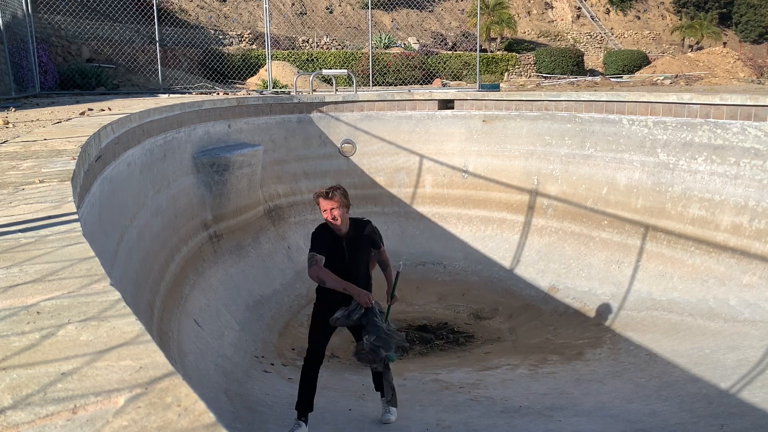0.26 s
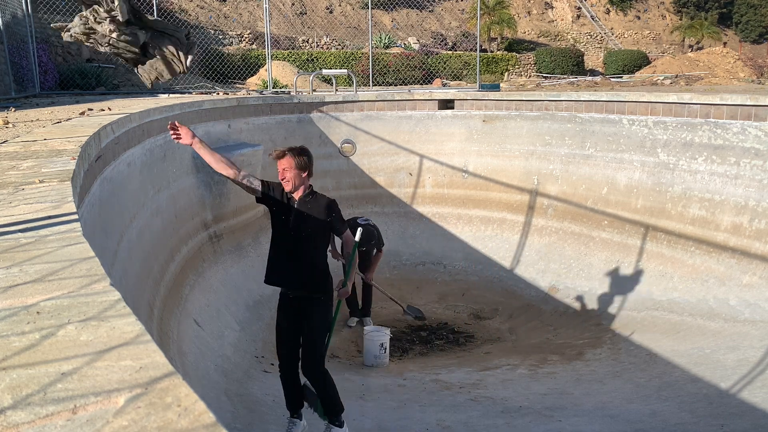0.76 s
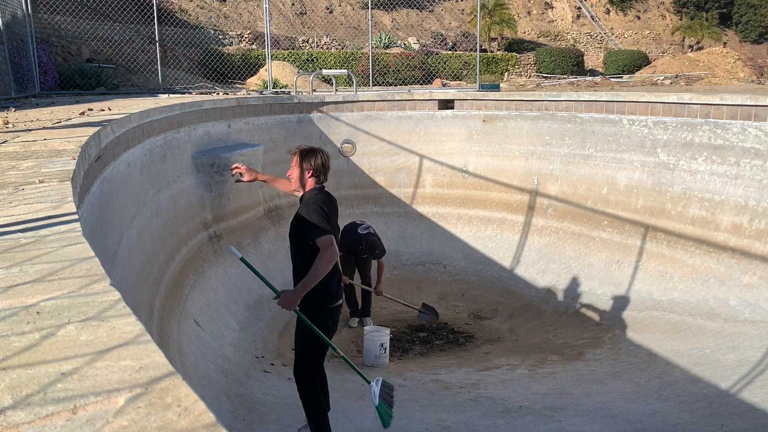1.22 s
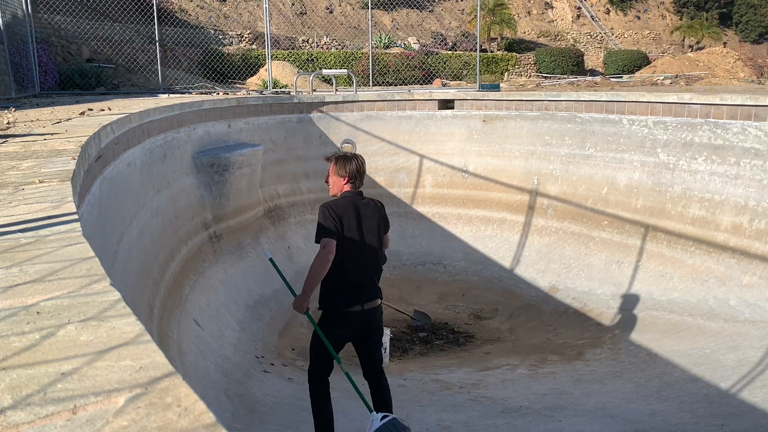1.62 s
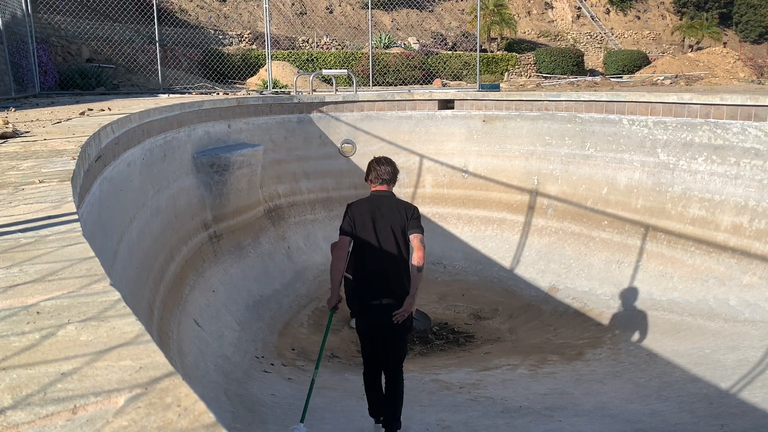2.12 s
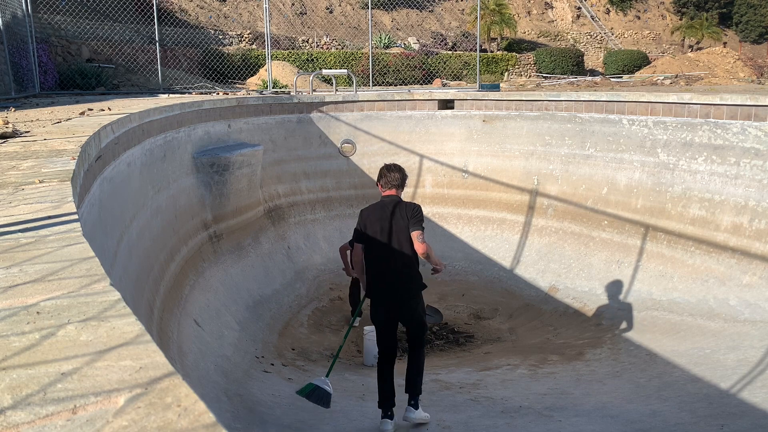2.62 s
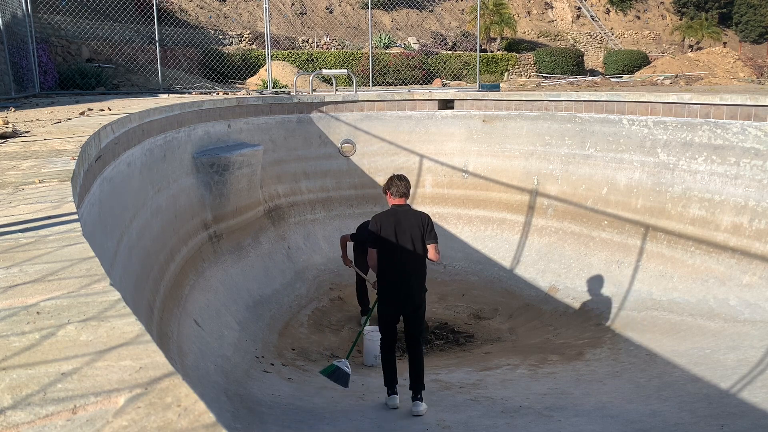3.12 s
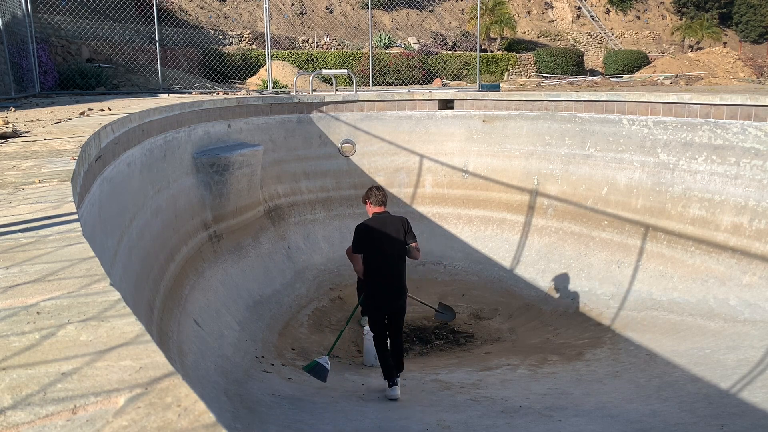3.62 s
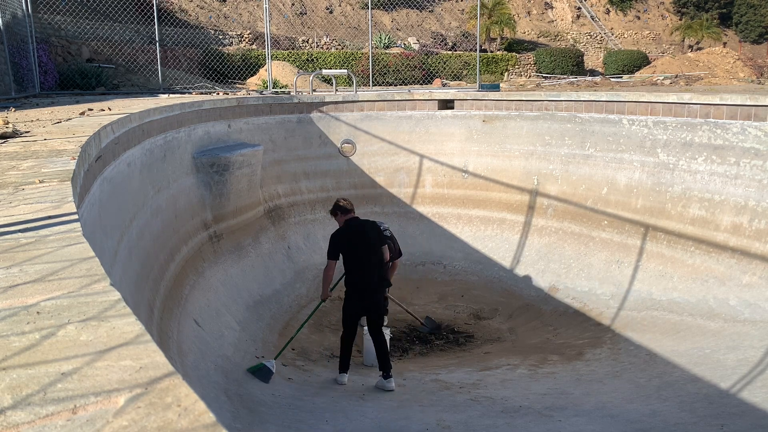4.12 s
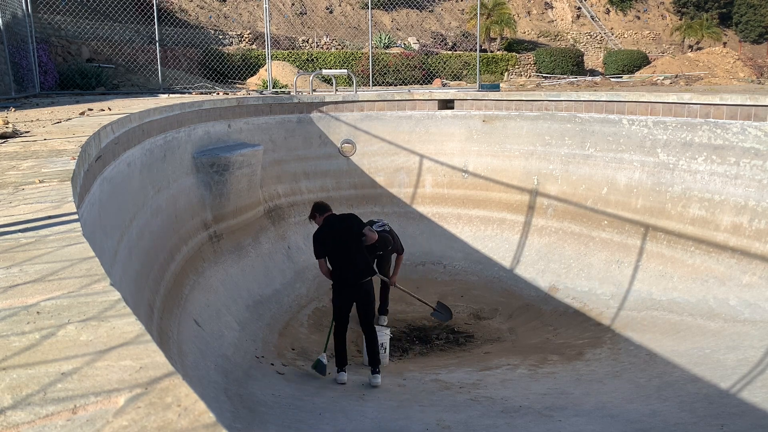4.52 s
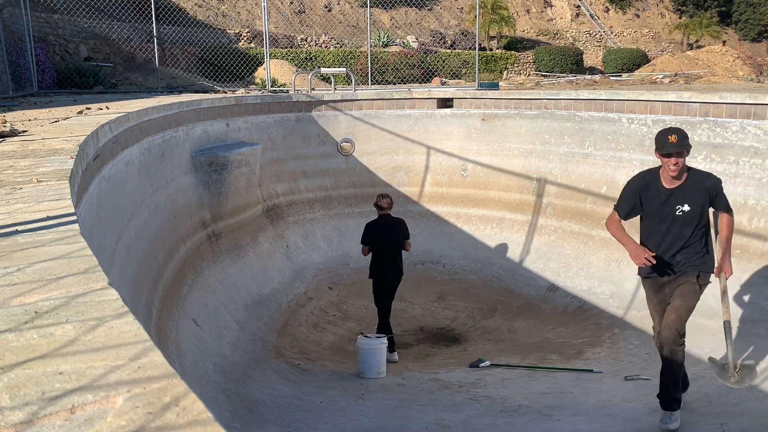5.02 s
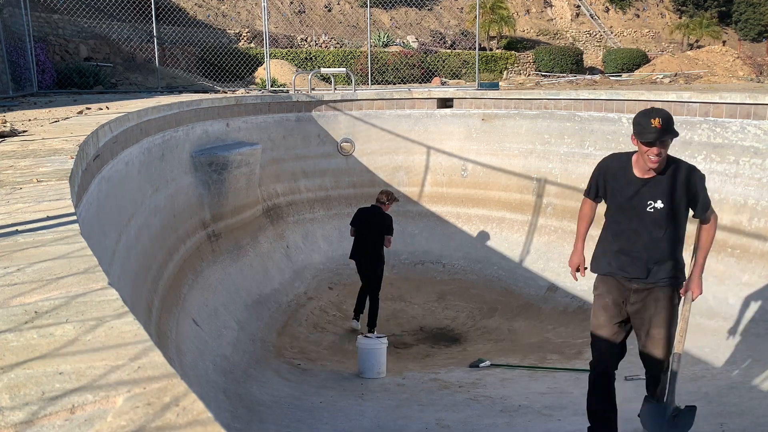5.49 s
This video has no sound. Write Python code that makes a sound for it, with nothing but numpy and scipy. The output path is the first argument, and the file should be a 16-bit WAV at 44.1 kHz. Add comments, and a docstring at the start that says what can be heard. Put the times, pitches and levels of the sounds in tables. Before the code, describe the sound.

A shovel blade grates through grit in an empty concrete pool, ringing with rough metallic resonance, while bristles and sand hiss. Knocks and dry debris cracks cluster in the first two seconds, strong scrapes return near three and four, then work stops. Light shoe taps and faint bird whistles finish. Short hard-wall echoes; a stereo handheld microphone catches low wind buffeting throughout most of it.

```python
"""A steel shovel is pushed through grit in an empty concrete pool outdoors: a rain of tiny grit impacts is heard
directly and also makes the blade's resonances ring. Filtered impacts make the hiss of bristles, leaves and sand.
Blade knocks, shoe taps and snapping debris are short bursts. Looped echoes stand for the curved walls.
Wind is low noise with swinging buffets at two microphone ports; far traffic and leaves are soft noise,
and a small bird whistles in gliding tones near the end."""
import sys
import numpy as np
from scipy import signal
from scipy.fft import rfft, irfft, next_fast_len
from scipy.io import wavfile
from scipy.ndimage import uniform_filter1d

SR = 44100
rng = np.random.default_rng(int(sys.argv[2]) if len(sys.argv) > 2 else 0)


def dump(signal):
    """Clip the signal to [-1, 1] and save it as 16-bit WAV at the path in sys.argv[1]."""
    limited = np.clip(np.atleast_2d(signal).T, -1, 1)
    pcm = np.round(limited * 32767).astype(np.int16)
    wavfile.write(sys.argv[1], SR, pcm)


N = 253575   # length in samples
HZ = np.maximum(np.fft.rfftfreq(N, 1 / SR), 1)   # frequency of every spectrum bin; never 0, for the logarithm

# Colour of cracking debris. Each row: frequency in Hz, relative level in dB per Hz.
DEBRIS_COLOUR = [(2000, -40), (4000, -2), (6000, -11.5), (8500, 5.5), (10500, -2), (12500, 3), (15500, -2)]


def amp(db):
    """Turn decibels into a gain."""
    return 10 ** (np.asarray(db) / 20)


def rms_one(x):
    """Scale a sound to an average (rms) strength of 1."""
    return x / np.sqrt(np.mean(x ** 2) + 1e-20)


def in_time(rows):
    """Draw straight lines between the rows of a time table: one curve per column, one value per sample."""
    s, *columns = np.transpose(rows)
    return [np.interp(np.arange(N) / SR, s, column) for column in columns]


def at_hz(points, hz):
    """Read a table of frequencies and values on a logarithmic frequency axis."""
    point_hz, values = np.transpose(points)
    return np.interp(np.log(hz), np.log(point_hz), values)


def drift(rate):
    """Slow random wander of spread 1; a higher rate (Hz) wanders faster."""
    step = 40   # samples between the random values
    r = np.exp(-2 * np.pi * rate * step / SR)
    noise = rng.standard_normal(N // step + 2002)
    slow = signal.lfilter([1], [1, -2 * r, r * r], noise)[2000:]   # skip the filter's start
    return np.interp(np.arange(N) / step, np.arange(len(slow)), rms_one(slow))


def grains(per_s, spread_db):
    """Two streams of random grain impacts, partly alike at the two ports; rms 1."""
    # How alike left and right are. Each row: frequency in Hz, likeness from 0 to 1.
    likeness = [(60, .6), (250, 1), (400, 1), (600, 0.83), (1200, 0.52), (2500, 0.69), (5000, 0.093),
                (8000, 1), (14000, 1)]
    loudness_db = spread_db * np.minimum(rng.exponential(1, (2, N)), 5)
    sizes = amp(loudness_db) * rng.choice([-1, 1], (2, N))
    hits = rng.random((2, N)) < per_s / SR
    mid, side = rfft(sizes * hits)
    alike = np.clip(at_hz(likeness, HZ), 0, .99)
    left_right = np.sqrt(1 + alike) * mid + np.sqrt(1 - alike) * side * [[1], [-1]]
    return rms_one(irfft(left_right, N))


def colour(x, spectrum):
    """Shape a steady, evenly spread sound to a spectrum, silent beyond its ends; rms 1."""
    inside = (HZ > spectrum[0][0]) & (HZ < spectrum[-1][0])
    return rms_one(irfft(rfft(x) * amp(at_hz(spectrum, HZ)) * inside, N))


def resonate(x, hz, width):
    """Pass a sound through one resonance, gain 1 at its centre; a narrow width (Hz) rings longer."""
    r = np.exp(-np.pi * width / SR)
    return signal.lfilter([(1 - r * r) / 2, 0, (r * r - 1) / 2], [1, -2 * r * np.cos(2 * np.pi * hz / SR), r * r], x)


def dying(times, peaks_db, t60s, rise_s):
    """Loudness curve of bursts that rise fast, then fall by 60 dB in the time t60 (seconds)."""
    out = np.zeros(N)
    for s, db, t60 in zip(times, peaks_db, t60s):
        t60, start = max(t60, .01), round(s * SR)
        t = np.arange(min(round(t60 * SR), N - start)) / SR
        out[start:][:len(t)] += amp(db - 60 * t / t60) * (1 - np.exp(-t / rise_s))
    return out


def swells(s, rise_s, hold_s, fall_s, *levels_db):
    """Each event swells, holds and fades; gives the summed gain of all events for every level column."""
    swell_db = 25   # gained over a rise, lost over a fall
    t = np.arange(N) / SR - np.c_[s]   # one row per event, 0 at full force
    slope = np.minimum(t / np.c_[rise_s], (np.c_[hold_s] - t) / np.c_[fall_s])
    shape = amp(swell_db * np.minimum(0, slope))
    return amp(levels_db) @ shape


def scraping():
    """Gains of blade, its low resonances, bristle hiss and sand hiss as grit is pushed, swept and shuffled."""
    # Shovel strokes. Each row: start of full force, rise, hold and fall in seconds, then relative levels in dB
    # of the blade, its low resonances against the blade, bristle hiss and sand hiss.
    strokes = [(0.038, 0.19, 0.043, 0.18, -26, -9, -21, -23.5),
               (0.198, 0.21, .11, 0.048, -30.5, -7.5, -29, -22),
               (1.121, 0.087, 0.14, 0.056, -34, -8.5, -41, -34.5),
               (1.264, 0.0044, .01, 0.23, -23, -31, -28, -25),
               (1.52, 0.078, 0.039, 0.093, -12.5, -9, -19.5, -16.5),
               (1.836, 0.0034, 0.0018, 0.021, -10.5, -28, -26, -17),
               (1.894, .05, 0.026, 0.12, -13, -14, -20, -15),
               (2.059, .004, 0.0045, 0.1, -36, -26, -47, -38),
               (2.42, 0.018, 0.0038, 0.11, -38.5, -4, -62, -41),
               (2.552, 0.01, 0.0052, 0.25, -32.5, -8, -43, -31.5),
               (2.765, 0.22, 0.13, 0.21, -15.5, -5.5, -19, -19.5),
               (3.045, 0.22, 0.036, 0.051, -24.5, -20, -32.5, -24.5),
               (3.618, .003, 0.024, 0.11, -29, -7, -35, -25.5),
               (3.76, 0.11, 0.013, 0.18, -20.5, -6.5, -31, -24.5),
               (3.944, 0.084, 0.091, 0.11, -18.5, -6, -18.5, -14.5),
               (4.091, .15, .025, 0.076, -10, -14, -15.5, -12.5)]
    # Broom sweeps and scuffs in sand. Each row: start of full force, rise, hold and fall in seconds,
    # relative levels of bristle hiss and sand hiss in dB.
    sweeps = [(0.357, .05, .15, 0.052, -44, -40), (0.925, .02, .002, 0.027, -46, -38),
              (1.376, .2, .02, 0.18, -32, -30.5), (1.653, .015, .003, 0.11, -40, -31),
              (1.699, .01, .005, 0.1, -17.5, -19.5), (2.013, .08, .005, 0.085, -33, -29),
              (2.303, .03, .02, 0.18, -32.5, -40.5), (3.174, .002, .003, 0.037, -54, -38),
              (3.261, .002, .003, 0.061, -46, -39), (3.408, .15, .03, .02, -57, -45),
              (3.709, .01, .005, 0.1, -21, -21.5), (3.817, .06, .005, 0.032, -30, -18),
              (4.38, .45, .06, 0.19, -38, -40), (4.5, .2, .005, .07, -48, -51),
              (5.129, 0.016, 0.0092, 0.048, -31.5, -28), (5.452, .13, .005, 0.024, -65, -51.5),
              (5.654, .035, .003, 0.021, -39, -39)]
    # Faint shuffle of grit between strokes. Each row: time in seconds,
    # relative levels of blade, bristle hiss and sand hiss in dB.
    shuffle = [(0, -34.5, -56, -50), (.5, -42, -60, -54), (.62, -48.5, -56, -45.5), (.97, -48, -73, -55),
               (1.05, -36, -33.5, -30), (1.64, -39.5, -33, -31), (1.8, -39.5, -52, -43),
               (2.1, -43.5, -42, -41), (2.4, -37.5, -70, -36.5), (2.53, -67, -77, -46),
               (3.2, -84, -83, -62), (3.33, -39.5, -72, -38), (3.47, -62, -68, -65), (3.6, -64, -83, -50),
               (4.2, -42.5, -54, -64), (4.45, -47, -40, -57), (4.6, -79.5, -85, -55), (4.85, -75, -75, -67),
               (4.88, -51, -85, -45), (4.95, -61, -84, -65), (5.25, -60.5, -77, -62),
               (5.45, -51.5, -85, -83), (5.6, -69, -82, -75), (5.75, -52, -68, -47.5)]
    s, rise_s, hold_s, fall_s, blade_db, low_db, tips_db, sand_db = np.transpose(strokes)
    push, low, tips, sand = swells(s, rise_s, hold_s, fall_s, blade_db, blade_db + low_db, tips_db, sand_db)
    swept_tips, swept_sand = swells(*np.transpose(sweeps))
    faint, faint_tips, faint_sand = amp(in_time(shuffle))
    faint_low = faint * amp(-3.5)
    return push + faint, low + faint_low, tips + swept_tips + faint_tips, sand + swept_sand + faint_sand


def blade(drive, low_db, wander_db):
    """The steel's resonances depend on how it is held; the contact point wanders, so each swells on its own."""
    # Resonances of the steel. Each row: frequency in Hz, width in Hz,
    # relative level in dB with the blade flat, relative level in dB with it tipped.
    modes = [(296.7, 48, -1, 3.5), (500, 27, 7, -1.5), (637, 19, 2.5, -9.5), (797, 11, 6, 7),
             (958.6, 20, 7, -2), (984.5, 24, 17, 3), (1239, 25, 6.5, 9.5), (1429, 40, 13, 7.5),
             (1638, 18, 10.5, 14), (1809, 35, 3, 15), (1874, 29, -1, 13), (2118, 67, 9, 6.5),
             (2289, 21, 6.5, 13), (2386, 74, 4.5, -13), (2488, 44, -10.5, 10), (2847, 52, 11, 11.5),
             (3310, 110, 2, 0), (3320, 32, -2.5, 13.5), (3510, 17, 7, 14), (3543, 12, 0, 18),
             (3970, 30, -8.5, 2.5), (4053, 66, -2, 1.5), (4300, 29, 2, 9), (4770, 99, -5.5, 3),
             (5211, 21, -14, -7.5), (5560, 60, -7, -5.5), (6000, 51, -6, -15), (5996, 75, -2, 0),
             (6430, 17, 8.5, -11.5), (6570, 37, -17, -27)]
    # How far the blade is tipped. Each row: time in seconds, share from 0 to 1.
    tipping = [(0, 0.06), (.9, 0.13), (1.2, 0.33), (1.55, 0.51), (1.9, 0.52), (2.3, 0.53), (2.6, 0.52),
               (3.1, 0.24), (3.6, 0.98), (3.8, 0.93), (4.2, 0.6)]
    out = 0
    tip = np.clip(in_time(tipping)[0], 0, 1)
    for k, (hz, width, flat_db, tipped_db) in enumerate(modes):
        level_db = flat_db + tip * (tipped_db - flat_db)
        if hz < 700:
            level_db = level_db + low_db
        mode_drive = drive * amp(level_db + wander_db * drift(16.0))
        out = out + (-1) ** k * resonate(mode_drive, hz, width)   # every other mode is upside down
    return out


def shovel(push, low):
    """Grit impacts sound directly and ring the blade, more so the harder the push; knocks strike the same steel."""
    # Blade on concrete. Each row: start in seconds, relative peak in dB, thud against it in dB,
    # crack against it in dB, basic time to fall by 60 dB in seconds.
    knocks = [(1.264, -15.5, -7, -14, 0.13), (1.445, -24, -24, -13, 0.2), (1.8326, -5.5, -21.5, -32, 0.046),
              (1.8804, -19, -30.5, 1, 0.4), (2.0504, -19.5, -37, -32, 0.079),
              (2.4114, -33.5, -0.5, -22, 0.14), (2.5469, -23, -11, 0, 0.095), (3.6226, -18, -10, 0, 0.062),
              (3.706, -29, -25, -0.5, 0.082), (3.7549, -24, -35, 18, 0.063)]
    # Colour of the grit heard directly. Each row: frequency in Hz, relative level in dB per Hz.
    grit_colour = [(200, -26.5), (300, -18.5), (700, 2), (1300, 5), (2500, 0.5), (4000, -1.5), (6000, -27),
                   (10000, -7.5), (16000, -25)]
    push_ring_end_s = 4.86   # from here on pushing no longer rings the blade
    low_db = 20 * np.log10(low / push)
    grit = grains(5000, spread_db=0.5) * amp(2.0 * drift(81))

    s, db, thud_db, crack_db, t60 = np.transpose(knocks)
    body = dying(s, db - 6, t60, rise_s=0.00014)
    first_contact = dying(s, db - 8.5, np.full(len(s), .015), rise_s=.0001)
    knock = body + first_contact

    # light contact leaves the steel quiet
    bite = (np.arange(N) < push_ring_end_s * SR) / (1 + amp(-36.5) / push)
    drive = grit * (push * bite + amp(-10.0) * knock)
    ringing = amp(8.5) * blade(drive, low_db + 11.5, wander_db=3.0)
    direct = colour(grit, grit_colour) * (push * (1 - 0.42 * bite) + amp(4.0) * knock)

    low_grit = signal.sosfilt(signal.butter(2, [180, 800], "band", fs=SR, output="sos"), grit)
    thud = rms_one(low_grit) * dying(s, db + thud_db + 5.5, 1.3 * t60, rise_s=.001)
    crack = colour(grit, DEBRIS_COLOUR) * dying(s, db + crack_db - 8.5, 0.82 * t60, rise_s=.0004)
    return ringing + direct + thud + crack


def hiss(tips, sand):
    """Fine sand and bristle tips hiss as countless small impacts, in clumps."""
    # Colours of bristle tips and of sand. Each row: frequency in Hz, relative level in dB per Hz.
    bristle_colour = [(6000, -25.5), (8000, -4), (10500, -3.5), (12500, -11), (15000, -6.5), (16500, -22)]
    sand_colour = [(1500, -15.5), (2200, -9), (2900, 1), (3350, -11.5), (3700, 1.5), (4050, -4.5),
                   (4400, 0), (5500, -5), (7000, -1.5), (8500, -10.5)]
    bristle_hiss = colour(grains(7300, spread_db=1.0), bristle_colour) * tips * amp(2.26 * drift(30))
    sand_hiss = colour(grains(12000, spread_db=3.5), sand_colour) * sand * amp(-3.0 + 2.24 * drift(30))
    return bristle_hiss + sand_hiss


def from_the_side(x):
    """On the side path the lows reach the right port late and a hollow opens in the middle treble."""
    # Share of scraping that arrives off the curved wall. Each row: time in seconds, share from 0 to 1.
    sideways = [(0, 0.01), (.95, 0.1), (1.05, 0.4), (1.26, 0.75), (1.33, 0.6), (1.5, 0.28), (1.83, 1),
                (1.88, 0.28), (2.05, 0.88), (2.45, 0.4), (2.55, 0.13), (3.5, 0), (4.2, .1)]
    # Tone of the side path. Each row: frequency in Hz, gain in dB.
    side_tone = [(20, 3.5), (600, 5.5), (1300, 3), (2400, 4), (2900, -9.5), (3300, -24.5), (3650, 2.5),
                 (20000, -7)]
    lag_s, lag_top_hz = 0.00035, 1650   # the delay fades out around the top frequency
    share = np.clip(in_time(sideways)[0], 0, 1)
    late = np.exp(-2j * np.pi * HZ * lag_s / (1 + (HZ / lag_top_hz) ** 6))
    path = amp(at_hz(side_tone, HZ)) * np.array([np.ones(len(HZ)), late])
    return (1 - share) * x + share * irfft(rfft(x) * path, N)


def pool(x):
    """Echoes go round and round between the walls, weaker and duller each time, six loops a side."""
    t60_s, wall_cut_hz = 0.23, 1600   # time to fall by 60 dB before dulling; where dulling sets in
    size = next_fast_len(N + SR)
    w = 2 * np.pi * np.fft.rfftfreq(size, 1 / SR)
    dull = 1 / (1 + 1j * w / (2 * np.pi * wall_cut_hz))
    echo = np.zeros((2, len(w)), complex)
    for k, lag in enumerate(rng.uniform(.015, .045, 12)):   # seconds per round
        loop = amp(-60 * lag / t60_s) * dull * np.exp(-1j * w * lag)
        echo[k % 2] += (-1) ** (k // 2) * loop / (1 - loop)   # sum of all rounds
    return irfft(rfft(x.mean(axis=0), size) * echo, size)[:, :N]


def wind():
    """Lumpy low pressure noise, partly its own at each port; buffets swing a few cycles, sagging in pitch."""
    # Wind between gusts. Each row: time in seconds, relative level in dB.
    steady_wind = [(0, -30), (.35, -25.5), (.55, -29.5), (.75, -37.5), (.85, -28.5), (1.1, -30),
                   (1.65, -30), (2.08, -33.5), (2.33, -27.5), (2.75, -34), (3.0, -24.5), (3.6, -27),
                   (4.25, -26), (4.55, -32), (4.83, -27.5), (4.88, -45), (5.16, -33), (5.44, -44.5),
                   (5.67, -42), (5.75, -42)]
    # Gusts. Each row: time of the peak in seconds, relative peak in dB.
    gust_peaks = [(0.0, -23), (0.12, -18.5), (0.22, -33.5), (0.38, -13.5), (0.53, -21.5), (0.94, -29.5),
                  (1.2, -18.5), (1.87, -25), (2.02, -23.5), (2.37, -11.5), (2.5, -22), (2.64, -12),
                  (2.77, -18), (2.855, -10), (2.95, -18.5), (3.379, -15), (3.709, -27), (3.79, -31),
                  (4.0, -25.5), (4.06, -28.5), (4.32, -26), (4.481, -29), (4.66, -26.5), (4.77, -12),
                  (5.01, -33.5), (5.481, -26), (5.691, -41.5)]
    # Colour of the wind. Each row: frequency in Hz, relative level in dB per Hz.
    gust_colour = [(12, -48), (20, 7.5), (43, 0.5), (65, 6.5), (107, -2.5), (188, -15), (250, -23),
                   (320, -47.5), (550, -120)]
    # Buffets. Each row: start in seconds, relative peak in dB, pitch they sag towards in Hz.
    buffets = [(0.217, -11.5, 57), (0.377, -12, 50), (0.439, -33, 64.4), (1.191, -33, 62),
               (2.348, -10, 67.3), (2.631, -10, 65.3), (2.849, -15, 112), (2.925, -19.5, 88.6),
               (3.174, -20.5, 100.3), (3.294, -13, 100.5), (3.367, -12.5, 82.8), (3.545, -22.5, 90.3),
               (4.399, -14, 69.8), (4.466, -26, 73.6), (4.649, -33.5, 81), (4.759, -19.5, 48.4),
               (4.998, -37, 59.2)]
    buffet_s, start_pitch, sag_s = 0.084, 2.25, .012   # length, starting pitch as a multiple, sag time

    shared, left, right = colour(rng.standard_normal((3, N)), gust_colour)
    s, db = np.transpose(gust_peaks)
    gusts, = swells(s, 0.053, 0, 0.061, db)   # rise, hold and fall in seconds
    lumps = (amp(in_time(steady_wind)[0]) + gusts) * amp(-2.5 + 1.4 * drift(25))
    out = lumps * (1.396 * shared + .5 * np.array([left, right]))

    t = np.arange(round(buffet_s * SR)) / SR
    for s, db, hz in buffets:
        pitch = hz * (1 + (start_pitch - 1) * np.exp(-t / sag_s))
        swing = np.sin(np.pi * np.sqrt(t / buffet_s)) * np.sin(2 * np.pi * np.cumsum(pitch) / SR)
        out[:, round(s * SR):][:, :len(t)] += amp(db - 4.5) * swing
    return signal.sosfilt(signal.butter(4, 34, "high", fs=SR, output="sos"), out)


def surroundings():
    """Far traffic and leaves blur into smooth, diffuse noise with the bass alike at both ports."""
    # Loudness of the surroundings. Each row: time in seconds, relative level in dB.
    air_level = [(0, -41.5), (.35, -43.5), (.57, -51), (.88, -51.5), (1.07, -40.5), (1.42, -40.5),
                 (2.24, -44.5), (2.64, -43), (2.8, -41), (3.08, -42.5), (3.6, -47.5), (3.8, -44),
                 (4.72, -47.5), (5.75, -47.5)]
    # Colour of the surroundings. Each row: frequency in Hz, relative level in dB per Hz.
    distant_colour = [(71, -20.5), (120, -7.5), (362, -10.5), (454, -9), (856, -17.5), (3820, -32),
                      (6630, -40), (8480, -68), (10200, -41.5), (13000, -47.5), (16000, -46.5)]
    shared, left, right = rng.standard_normal((3, N))
    bass = signal.sosfilt(signal.butter(2, 350, fs=SR, output="sos"), shared)
    noise = colour(np.array([left, right]) + 1.82 * bass, distant_colour)
    return amp(in_time(air_level)[0] + 6.5) * noise


def taps():
    """Each shoe tap or tick is a click and a short gritty burst, twice through one broad resonance."""
    # Shoe taps and small ticks. Each row: start in seconds, relative peak in dB, centre in Hz,
    # time for the burst to fall by 60 dB in seconds.
    tap_list = [(0.306, -19, 890, 0.043), (0.307, -17, 296, 0.045), (1.014, -25, 325, 0.04),
                (1.021, -29, 680, 0.065), (2.223, -27, 3140, 0.021), (3.175, -40, 4200, .03),
                (2.42, -32, 1730, 0.12), (3.31, -37, 2820, 0.12), (3.343, -18, 1420, 0.01),
                (3.346, -23.5, 490, 0.034), (3.259, -40, 3500, .05), (5.115, -31, 780, 0.027),
                (5.116, -29, 350, 0.03), (5.131, -32.5, 2260, 0.08), (5.181, -51.5, 3000, 0.52),
                (5.25, -36, 640, 0.032), (5.25, -30, 280, .03), (5.27, -50, 1210, 0.09),
                (5.43, -48, 2000, 0.066), (5.597, -43, 900, 0.024), (5.633, -46, 2930, .1),
                (5.646, -42, 2300, 0.2), (5.658, -39, 1670, 0.11), (5.693, -23.5, 201, 0.066),
                (5.692, -25, 860, 0.026), (5.694, -31, 3330, 0.013)]
    out, grit = np.zeros((2, N)), grains(9000, spread_db=3.0)
    for s, db, hz, t60 in tap_list:
        at = slice(round(s * SR), round((s + .2) * SR))
        burst = (grit * dying([s], [db + 9.5], [t60], rise_s=0.00043))[:, at]
        burst[:, 0] += amp(db + 16)   # the click
        width = 0.56 * hz
        rung = resonate(resonate(burst, hz, width), hz, width)
        out[:, at] += rung * np.sqrt(SR / hz / 4)   # lower taps pass less sound, so lift them
    return out


def snaps():
    """Dry twigs and leaves crack as bright bursts of impacts, with a thin ring on top."""
    # Snaps of dry debris. Each row: start in seconds, relative peak in dB, time to fall by 60 dB in seconds.
    snap_list = [(0.9238, -53, 0.039), (1.037, -29, 0.035), (1.295, -12.5, 0.1), (1.378, -18.5, 0.08),
                 (1.3907, -19, 0.12), (1.6362, -14.5, 0.11), (1.697, -9.5, 0.079), (1.9985, -22, 0.13),
                 (2.1494, -44, 0.14), (2.4418, -38.5, 0.13), (3.174, -35, 0.045), (3.259, -38, 0.1),
                 (3.3233, -48, 0.069), (3.3694, -52, 0.061), (3.3997, -42, 0.047), (3.4294, -40, 0.025),
                 (3.6646, -29, 0.095), (4.552, -55, 0.037), (4.6039, -55, 0.071), (4.6414, -56, 0.089),
                 (4.9437, -61, 0.08), (5.4455, -59, 0.041), (5.6361, -51, 0.08)]
    # The thin ring: frequency in Hz, width in Hz, relative level in dB.
    snap_ring = (10500, 140, -2.9)
    s, db, t60 = np.transpose(snap_list)
    crackle = grains(15000, spread_db=4.0)
    hz, width, ring_db = snap_ring
    envelope = dying(s, db + 1.5, t60, rise_s=0.00013)
    # a narrow resonance passes little of the crackle, so lift it
    ring = resonate(crackle * envelope, hz, width) * amp(ring_db) * np.sqrt(SR / width / np.pi)
    return colour(crackle, DEBRIS_COLOUR) * envelope + ring


def bird():
    """Short whistles from afar glide through three pitches, a little unsteady in level and stronger on the left."""
    # Bird notes. Each row: start in seconds, length in seconds, start, middle and end pitch in Hz before
    # smoothing, relative level in dB.
    notes = [(4.98, .07, 4000, 4150, 3900, -60), (5.0, .04, 4400, 4500, 4300, -61),
             (5.035, .04, 4050, 3750, 3450, -57), (5.33, .05, 4200, 4400, 3950, -60),
             (5.335, .1, 3500, 3600, 3350, -59), (5.36, .045, 4000, 4000, 3900, -55),
             (5.49, .035, 4250, 4100, 3900, -55), (5.535, .06, 3950, 4200, 3900, -60)]
    out = np.zeros(N)
    for s, length, *pitch_hz, db in notes:
        corners = np.interp(np.linspace(0, 2, round(length * SR)), [0, 1, 2], pitch_hz)
        glide = uniform_filter1d(corners, size=300)   # round the corners
        whistle = np.hanning(len(glide)) * np.sin(2 * np.pi * np.cumsum(glide) / SR)
        out[round(s * SR):][:len(glide)] += amp(db) * whistle
    return out * amp(4.3 * drift(150)) * amp([[2], [-2]])


def scene():
    """Add work, bird and their echoes to wind and surroundings; the level of everything dips briefly."""
    # Level of the whole sound, held before the first row and after the last.
    # Each row: time in seconds, gain in dB.
    overall_level = [(4.855, -4), (4.862, -21), (4.9, -5.5), (4.97, 0.5)]
    push, low, tips, sand = scraping()
    scrape = from_the_side(shovel(push, low) + hiss(tips, sand))
    in_pool = scrape + taps() + snaps() + bird()
    heard = in_pool + amp(-9) * pool(in_pool) + wind() + surroundings()
    return heard * amp(in_time(overall_level)[0])


def record(dry):
    """The two ports differ in path and cavity, so in timing and level; peaks are rounded, the top is cut."""
    # How far left lags right, in the lows and mids, then in the treble.
    # Each row: frequency in Hz, lag in half turns of the wave.
    port_lag = [(20, -0.17), (350, -0.3), (600, -0.14), (1000, -0.041), (1500, 0.091), (3000, -0.4),
                (4200, 0.069)]
    treble_lag = [(5500, .05), (8600, 1), (11100, 2), (13600, 3), (16100, 4)]
    # Level difference of the ports. Each row: frequency in Hz, left minus right in dB.
    port_balance = [(60, 1), (110, -0.5), (200, -1), (380, 0), (700, 0), (1290, -2.5), (2380, -0.5),
                    (4400, -3.5), (8120, -0.5), (15000, 0.5)]
    size = next_fast_len(N + 4096)
    hz = np.maximum(np.fft.rfftfreq(size, 1 / SR), 1)
    half_turns = np.interp(hz, *np.transpose(port_lag + treble_lag))
    # each port takes half of the difference, in opposite directions
    left = amp(at_hz(port_balance, hz) / 2) * np.exp(-.5j * np.pi * half_turns)
    ports = irfft(rfft(dry, size) * [left, 1 / left], size)[:, :N]
    rounded = .96 * np.tanh(ports / .96)
    return signal.sosfilt(signal.cheby2(12, 70, 16450, fs=SR, output="sos"), rounded)   # 70 dB down from 16450 Hz


dry = scene()
out = record(dry)
dump(out)
```